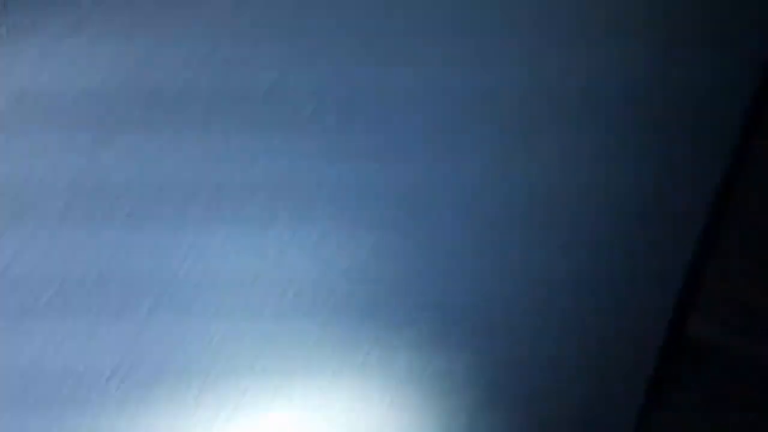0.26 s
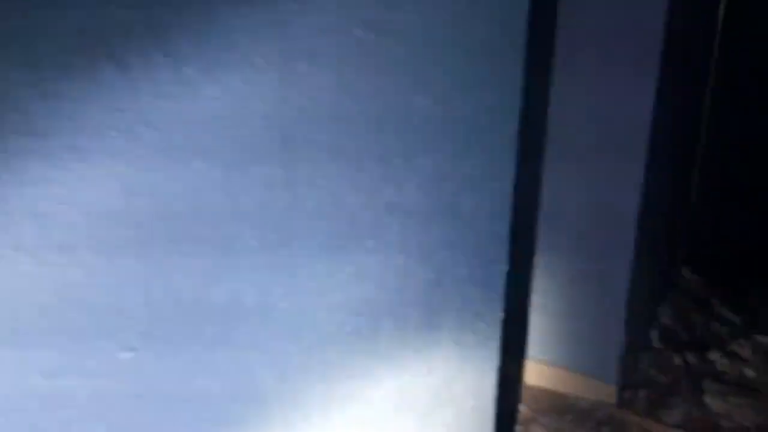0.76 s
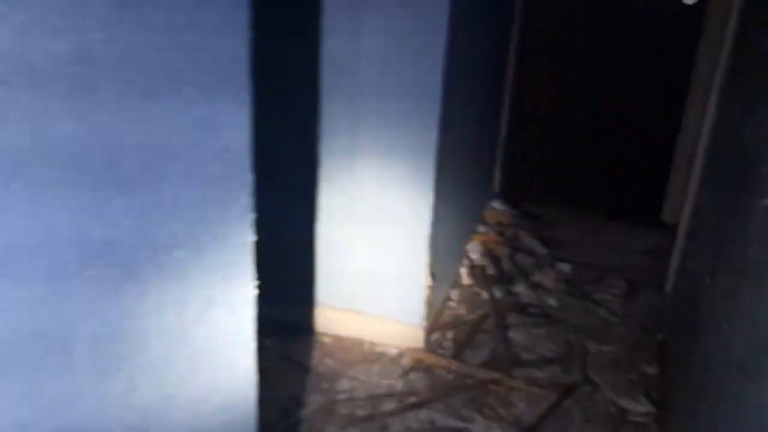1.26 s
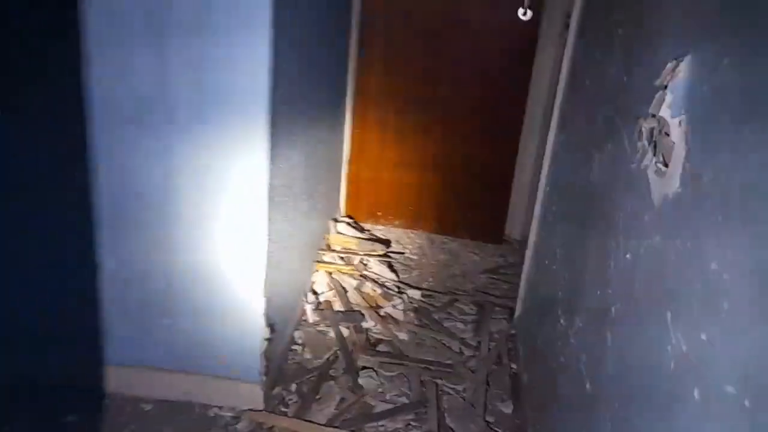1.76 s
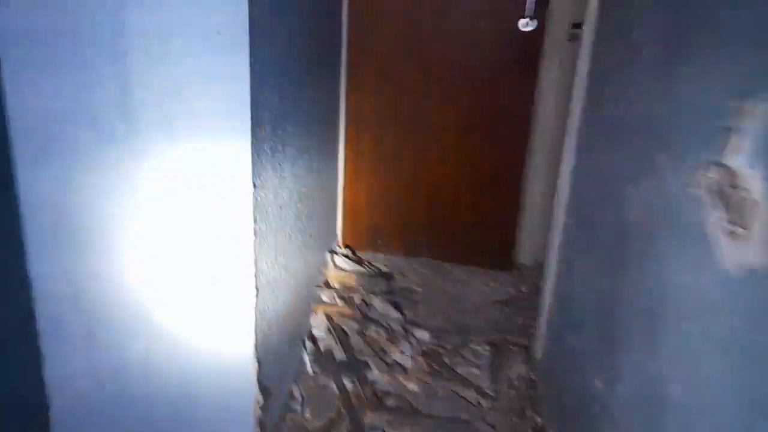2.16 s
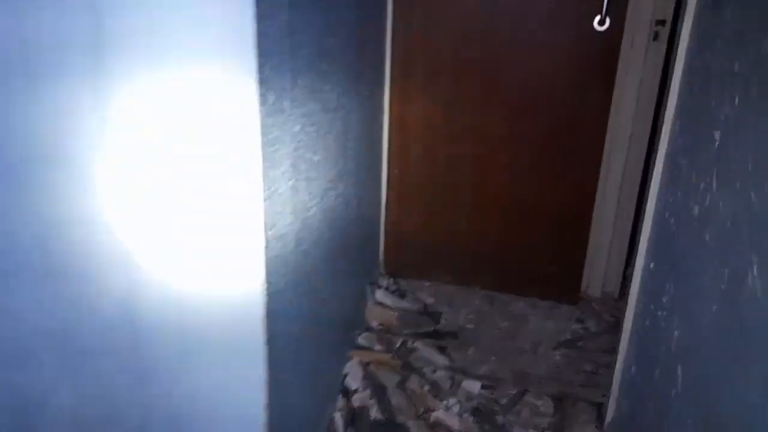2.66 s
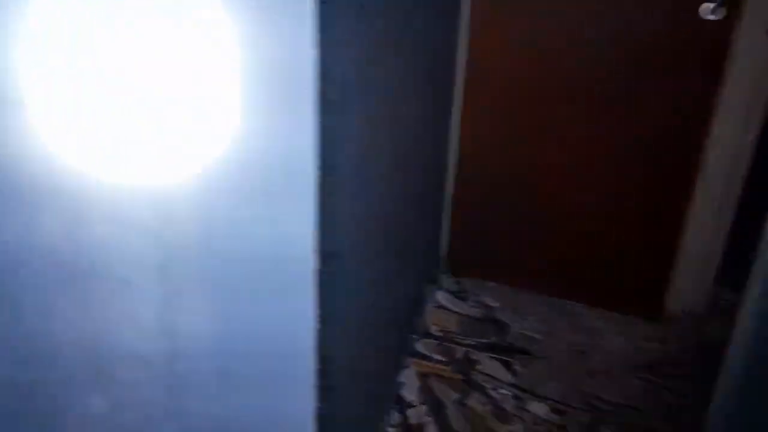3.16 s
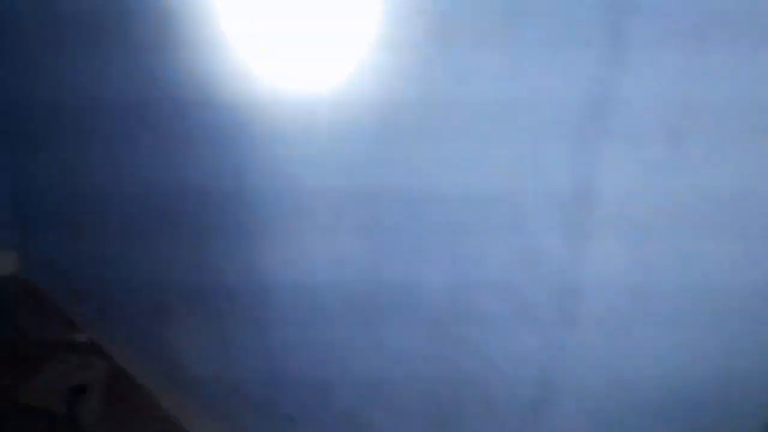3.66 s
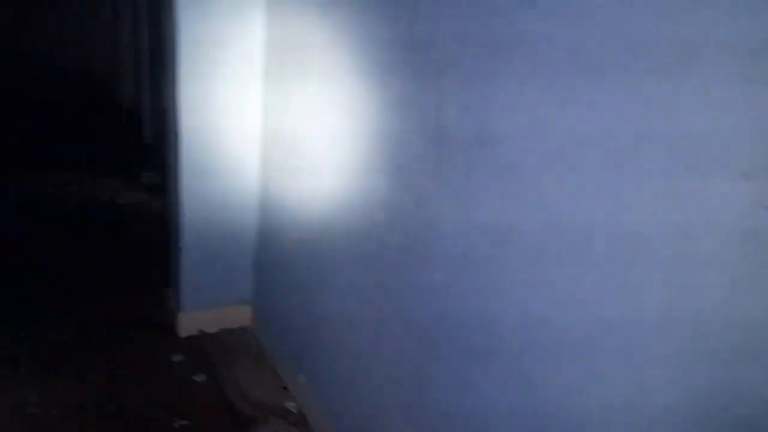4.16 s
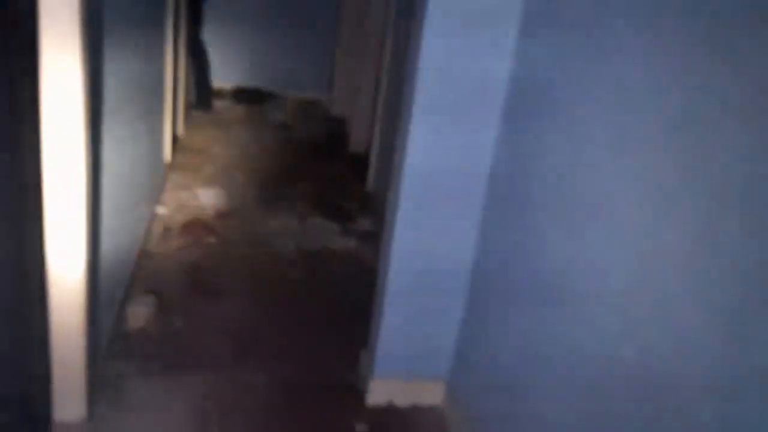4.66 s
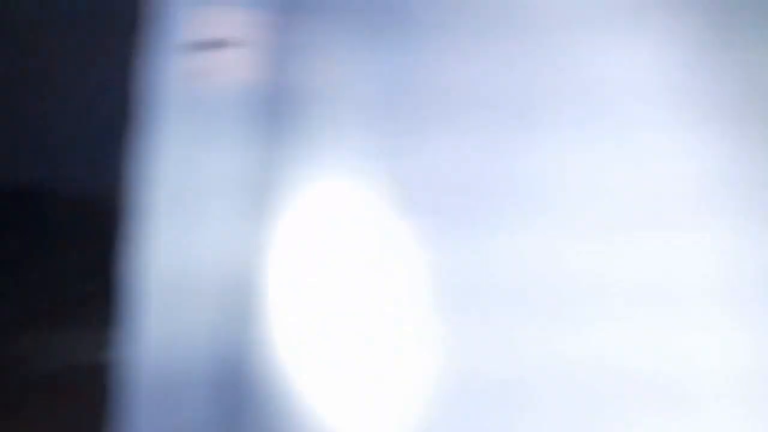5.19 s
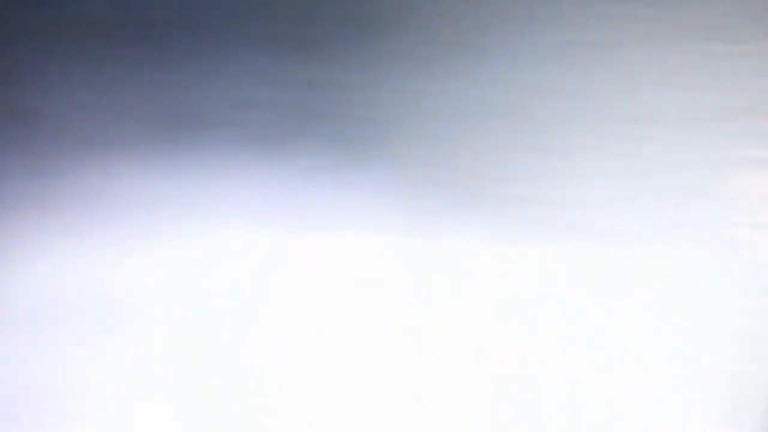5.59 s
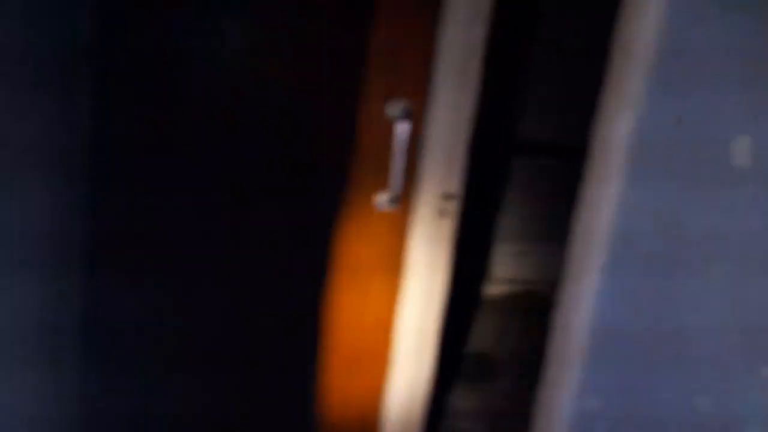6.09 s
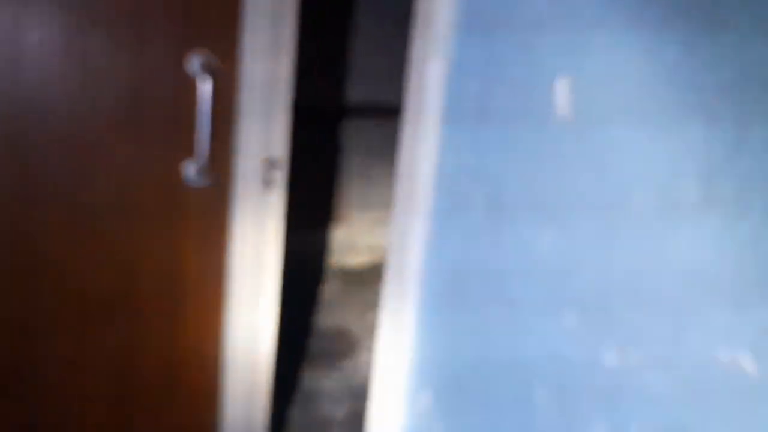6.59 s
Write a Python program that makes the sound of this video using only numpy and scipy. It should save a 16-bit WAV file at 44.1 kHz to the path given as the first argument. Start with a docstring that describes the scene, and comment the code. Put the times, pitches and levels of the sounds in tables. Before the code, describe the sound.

Someone walks unevenly across a littered wooden floor in a small, bare room. Steps thud on the boards, soles scuff, grit ticks and loose slats clack, with clothes swishing in between. About two seconds in, a board drags with a brief judder, then a shard breaks with a loud, sharp crack. Two more snaps follow later, before a last cluster of knocks. The sounds are close, in stereo, with a short ring off the walls.

```python
"""A small, bare, derelict room with a littered wooden floor, heard on a stereo pair of microphones.
Someone picks their way across: steps thud on the boards, loose slats clack, grit ticks, and brittle
shards snap underfoot, close by. One board drags, juddering as it sticks and slips. Clothes swish and
soles scuff in between, and the bare walls ring briefly after the knocks and cracks."""
import sys
import numpy as np
from scipy import signal
from scipy.fft import rfft, irfft, next_fast_len
from scipy.io import wavfile
from scipy.ndimage import uniform_filter1d

SR = 44100
rng = np.random.default_rng(int(sys.argv[2]) if len(sys.argv) > 2 else 0)


def wav_record(signal):
    """Record a signal, one row per channel, as 16-bit PCM in the file named by sys.argv[1]."""
    frames = np.transpose(np.atleast_2d(signal))
    bounded = np.clip(frames, -1, 1)
    # unit amplitude maps onto the largest positive 16-bit level
    quanta = np.round(bounded * 32767).astype(np.int16)
    wavfile.write(sys.argv[1], SR, quanta)


N = 301283
TIME = np.arange(N) / SR
CONTROL_S = np.arange(0, N / SR + .002, .002)   # coarse clock for the rubbing strokes
HIT_SIZE = SR // 2   # samples in a thud or the room's tail
BURST_HZ = np.arange(1025) * SR / 2048   # frequency axis of a crack

# feet and loose boards landing on the floor: t/s, level/dB, f/Hz
THUDS = [(.486, -24.5, 250), (.498, -23.5, 104), (.504, -28.5, 62), (.562, -34, 172), (0.759, -36, 86),
         (1.094, -41, 250), (1.331, -45, 114), (1.467, -27.5, 230), (1.469, -25, 108), (1.549, -36, 183),
         (1.616, -31.5, 175), (1.769, -37.5, 125), (1.85, -27, 200), (2.226, -23, 280), (2.403, -28, 170),
         (2.46, -18, 300), (2.574, -38, 175), (2.691, -13.5, 250), (2.73, -22, 178), (2.945, -40.5, 136),
         (3.245, -31, 242), (3.265, -27.5, 200), (3.292, -25, 209), (3.72, -29.5, 212), (3.762, -34, 154),
         (3.867, -39, 94), (4.187, -37.5, 208), (4.222, -27, 141), (4.322, -28.5, 254), (4.621, -31, 262),
         (4.734, -30.5, 203), (4.77, -33.5, 168), (5.079, -43, 177), (5.2, -43, 177), (5.98, -42.5, 170.4),
         (6.04, -48.5, 150), (6.489, -26.5, 126), (6.499, -30, 60), (6.523, -33.5, 294), (6.573, -35, 154),
         (6.661, -33, 270), (6.725, -33, 79)]
# resonances of the wooden floor: f/Hz, level/dB, t60/s
FLOOR_MODES = [(51.9, -4, .2), (67.5, -0.5, 0.36), (109.5, -2, 0.34), (137.7, -0.5, 0.22),
               (169.6, -5, 0.17), (183.5, -11, 0.34), (201.8, -3.5, 0.17), (250.8, -5.5, 0.3),
               (275.4, -6, 0.127), (334.2, -12, .25), (411, -3, 0.1), (480, -2.5, 0.17), (505, -17, 0.44),
               (583, 0.5, 0.14), (700, -27.5, 0.14), (737, -4.5, 0.25), (860, -3.5, .2)]


def from_db(db):
    """Decibels to gain."""
    return 10 ** (np.asarray(db) / 20)


def rms_one(x):
    """Scale to rms 1."""
    return x / np.sqrt(np.mean(x ** 2) + 1e-20)


def at_hz(points, hz):
    """Read a table on a log-frequency axis."""
    f, value = np.transpose(points)
    return np.interp(np.log(np.maximum(hz, 1)), np.log(f), value)


def band(x, low_hz, high_hz, order=2):
    """Causal band-pass."""
    sos = signal.butter(order, [low_hz, min(high_hz, SR / 2 - 500)], "band", fs=SR, output="sos")
    return signal.sosfilt(sos, x + 1e-18)


def add(out, s, sound):
    """Mix a sound in, starting at time s."""
    i = max(round(s * SR), 0)
    out[..., i:i + sound.shape[-1]] += sound[..., :N - i]


def panned(x, pan_db):
    """The nearer microphone hears it louder and a little sooner."""
    lag = int(np.clip(pan_db, -8, 8))   # one sample per dB
    left = np.pad(x, (max(-lag, 0), max(lag, 0)))
    right = np.pad(x, (max(lag, 0), max(-lag, 0)))
    return np.array([left * from_db(pan_db / 2), right * from_db(-pan_db / 2)])


def ring(clicks, hz, t60):
    """A unit click sets a sine of height 1 ringing."""
    r, w = 1e-3 ** (1 / (t60 * SR)), 2 * np.pi * hz / SR
    return signal.lfilter([0, np.sin(w)], [1, -2 * r * np.cos(w), r * r], clicks + 1e-18)


def resonate(force, modes):
    """A force rings the modes of a piece of wood, alternating in sign."""
    return sum((-1) ** k * from_db(db) * ring(force, hz, t60) for k, (hz, db, t60) in enumerate(modes))


def diffuse(colour, size=N):
    """Stereo noise of a given colour, alike at both microphones in the bass only; rms 1."""
    # likeness across the pair: f/Hz, left-right correlation
    likeness = [(50, 0.96), (200, 0.78), (350, 0.74), (650, 0.33), (1300, -0.15), (3000, -0.04),
                (7000, -0.058), (16000, -0.18)]
    count = next_fast_len(size)
    hz = np.arange(count // 2 + 1) * SR / count
    alike = at_hz(likeness, hz)
    mid, side = rfft(rng.standard_normal((2, count))) * from_db(at_hz(colour, hz))
    spectrum = np.sqrt(1 + alike) * mid + np.sqrt(1 - alike) * side * [[1], [-1]]
    return rms_one(irfft(spectrum, count)[:, :size])


def room_tone():
    """The faint hiss and rumble of the still room; rms 1."""
    # spectrum of the still air: f/Hz, level/dB
    still_air = [(18, -40), (30, 7.5), (355, -2), (426, -16.5), (740, 0), (3580, -15), (6720, -18),
                 (8080, -21.5), (14000, -13.5), (16000, -27)]
    return diffuse(still_air)


def room(x):
    """Dense reflections off bare walls, dying octave by octave; unit energy per microphone."""
    # reverberation time: f/Hz, t60/s
    room_t60 = [(80, 0.26), (250, 0.28), (700, 0.35), (2000, 0.39), (5000, 0.28), (9000, 0.24),
                (15000, 0.16)]
    t = np.arange(HIT_SIZE) / SR
    noise = diffuse([(20, 0), (20000, 0)], size=HIT_SIZE)
    edges_hz = np.geomspace(40, 20000, 10)
    tail = sum(band(noise, lo, hi, order=3) * 1e-3 ** (t / at_hz(room_t60, np.sqrt(lo * hi)))
               for lo, hi in zip(edges_hz, edges_hz[1:]))
    tail *= 1 - np.exp(-t / 0.00084)   # the reflections build up
    return signal.oaconvolve(x[None], tail / np.sqrt(np.sum(tail ** 2) / 2), axes=1)[:, :N]


def stroke(s, level_db, rise_s, fall_s):
    """Power of one rub: it gains 10 dB over rise_s, peaks at time s and loses 10 dB over fall_s."""
    before = np.clip((s - CONTROL_S) / rise_s, 0, 8)
    after = np.clip((CONTROL_S - s) / fall_s, 0, 8)
    drop_db = 10 * (before ** 0.98 + after ** 1.28)   # exponent 1 is a straight slope, 2 a bell
    return from_db(level_db - drop_db) ** 2


def envelope(power):
    """The power of strokes as a gain at every sample."""
    return np.interp(TIME, CONTROL_S, np.sqrt(power))


def grain(per_s, depth_db):
    """The uneven gain of a rubbing contact that catches and lets go."""
    steps = rng.standard_normal(N // 20)
    return rms_one(from_db(depth_db * np.interp(TIME * per_s, np.arange(len(steps)), steps)))


def catching_cloth():
    """The weave catches at a steady rate as it slides, giving a narrow rasp or squeak."""
    # catches of the cloth: t/s, level/dB, rise/s, fall/s, f/Hz, width/Hz
    catches = [(1.9, -56, .06, .25, 2750, 328), (2.14, -55, 0.11, 0.11, 2750, 250),
               (3.78, -54, 0.024, .06, 12600, 302), (5.99, -60, 0.012, 0.034, 2490, 200),
               (6.2, -70, 0.38, 0.29, 3080, 250), (6.28, -68, 0.31, 0.2, 4460, 350)]
    noise = rng.standard_normal((2, N))
    out = np.zeros((2, N))
    for s, db, rise_s, fall_s, hz, width_hz in catches:
        squeak = rms_one(band(noise, hz - width_hz / 2, hz + width_hz / 2, order=1))
        out += envelope(stroke(s, db, rise_s, fall_s)) * squeak
    return out


def movement(scuff_rise_s=0.027, settle_db=-43, settle_follows=0.36):
    """Gains of hiss, its top-end sheen, scuffing and floor rumble over all swings, scuffs and landings."""
    # swings of an arm or leg: t/s, level/dB, rise/s, fall/s, relative sheen/dB, relative dull flap/dB
    swishes = [(.47, -50.5, 0.22, .12, 6.5, -2), (.75, -47.5, 0.074, 0.12, 2.5, -3),
               (1.08, -54.5, 0.44, 0.14, -0.5, -0.5), (1.35, -57.5, 0.067, 0.21, -1, -4.5),
               (1.52, -53.5, 0.12, 0.18, 6, -4.5), (1.97, -43.5, 0.13, 0.29, 6.5, -5.5),
               (2.19, -49.5, 0.34, 0.75, -3, -20), (3.03, -66, 0.086, 0.05, -8, 1),
               (3.17, -59, 0.038, 0.54, 2, -0.5), (3.55, -47.5, 0.1, 0.23, -7, -3.5),
               (3.66, -48, 0.057, 0.045, 8, -4.5), (3.78, -53, 0.077, 0.17, 2, -3.5),
               (4.52, -59, 0.28, .2, -2, -12), (5.0, -53.5, 0.16, 0.52, 2, -2.5),
               (5.27, -56.5, 0.21, 0.14, 4, 4), (5.49, -58.5, .04, 0.21, 5, 3),
               (5.89, -54.5, 0.093, 0.087, 4, 2), (6.14, -62, 0.32, 0.37, 0.5, -5),
               (6.42, -57.5, 0.13, .1, 0, -25), (6.799, -49, 0.027, 0.088, 5.5, -3)]
    # soles scuffing the floor: t/s, level/dB, fall/s, relative hiss/dB
    scuffs = [(.5, -48, 0.093, -5.5), (.79, -58, 0.13, -14), (1.679, -48, 0.027, -0.5),
              (1.85, -46.5, 0.066, 0), (2.502, -46.5, 0.16, -7), (2.72, -48.5, 0.18, -21),
              (3.288, -46, 0.13, 2), (3.74, -52, 0.094, -4), (4.2, -54.5, 0.4, -4), (4.57, -50, 0.33, -3.5),
              (4.75, -52, 0.24, -4), (5.628, -47.5, .14, 4.5), (6.462, -44, 0.12, -5.5),
              (6.55, -42.5, 0.064, -4), (6.67, -53.5, .2, -3)]
    hiss, sheen, scuff, rumble = np.zeros((4, len(CONTROL_S)))
    for s, db, rise_s, fall_s, sheen_db, flap_db in swishes:
        power = stroke(s, db, rise_s, fall_s)
        hiss += power
        sheen += power * from_db(sheen_db) ** 2
        scuff += power * from_db(flap_db) ** 2
        rumble += power * from_db(-13) ** 2   # shifting weight stirs the floor
    for s, db, fall_s, hiss_db in scuffs:
        power = stroke(s, db, scuff_rise_s, fall_s)
        scuff += power
        hiss += power * from_db(hiss_db) ** 2
        sheen += power * from_db(hiss_db) ** 2
        rumble += power * from_db(-2.5) ** 2   # so does a moving foot
    for s, db, _ in THUDS:   # the floor settles after each landing
        rumble += stroke(s + scuff_rise_s, settle_db + settle_follows * db, scuff_rise_s, fall_s=.1)
    return [envelope(power) for power in (hiss, sheen, scuff, rumble)]


def clothes(hiss, sheen, split_hz=8500):
    """Sliding cloth swishes, with a separate gain for the sheen above the split."""
    # spectrum of rubbing cloth: f/Hz, level/dB
    cloth_colour = [(880, -37.5), (1500, -3), (1940, -2.5), (2120, -1.5), (2830, 0), (3380, -0.5),
                    (4730, -0.5), (5710, -3), (6960, -3), (8400, -6), (9190, -2), (9950, -7), (13900, -8.5),
                    (16000, -15.5)]
    fibres = diffuse(cloth_colour)
    top = signal.sosfiltfilt(signal.butter(2, split_hz, "high", fs=SR, output="sos"), fibres)
    return grain(per_s=37, depth_db=2.42) * (hiss * (fibres - top) + sheen * top)


def soles(scuff, gain_db=1.0, hollow_db=-9.0):
    """Soles scuff unevenly, and the floor's modes make the friction sound hollow."""
    # spectrum of a sole on wood: f/Hz, level/dB
    scuff_colour = [(180, -22), (300, -3), (431, -3), (560, -2), (629, -4.5), (818, -6.5), (863, -5),
                    (1030, -5), (1080, -8), (1170, -6.5), (1450, -8.5), (1570, -9), (1840, -10.5),
                    (2600, -20.5), (3380, -51.5), (5720, -120)]
    friction = diffuse(scuff_colour)
    hollow = from_db(hollow_db) * rms_one(resonate(friction, FLOOR_MODES))
    return from_db(gain_db) * scuff * grain(per_s=100, depth_db=2.2) * (friction + hollow)


def floor_rumble(rumble, gain_db=-0.5):
    """The boards rumble under moving weight."""
    # spectrum of the rumble: f/Hz, level/dB
    rumble_colour = [(18, -34), (30, -14), (59, -5.5), (92, -16), (128, -2), (151, -3), (211, -0.5),
                     (295, -3), (400, -18), (520, -31.5), (880, -120)]
    return from_db(gain_db) * rumble * grain(per_s=8.3, depth_db=3.5) * diffuse(rumble_colour)


def crumbs(scuff, gain_db=-8.0, per_s=170):
    """Crumbs roll under a scuffing sole: random tiny clicks, half direct and half room."""
    hits = rng.random(N) < per_s / SR
    sizes = from_db(0.96 * np.minimum(rng.exponential(1, N), 4))
    clicks = hits * sizes * rng.choice([-1, 1], N)
    direct = from_db(gain_db) * scuff * rms_one(band(clicks, 700, 6000, order=1))
    return (direct + room(direct)) / 2


def fracture(colour_db, decay_s):
    """One sharp click and a quickly dying crumble, in a given colour; peak 1."""
    t = np.arange(2 * len(BURST_HZ) - 2) / SR
    burst = 1.02 * rng.standard_normal(len(t)) * np.exp(-t / decay_s)
    burst[0] = 1
    phase = np.angle(rfft(burst))
    shaped = irfft(from_db(colour_db) * np.exp(1j * phase))
    crack = np.roll(shaped, 12)[:len(t) // 2]   # the shift keeps the click's leading edge
    return crack / np.abs(crack).max()


def shard(body_db, top_db, decay_s):
    """A brittle break: thick pieces have more body, thin ones a glassier top."""
    # spectrum of a shard's crack: f/Hz, level/dB
    shard_colour = [(200, -13.5), (600, -2.5), (1700, -1), (2900, -3), (3900, 6.5), (5300, 3), (7000, 7.5),
                    (9000, 0.5), (11000, -6), (13500, 1.5), (16000, -22.5)]
    thickness_db = at_hz([(1900, body_db), (3600, 0), (7500, 0), (11500, top_db)], BURST_HZ)
    return fracture(at_hz(shard_colour, BURST_HZ) + thickness_db, decay_s)


def grit():
    """Crumbs of plaster tick as the soles crush them."""
    # ticks of grit: t/s, level/dB, left-right/dB
    ticks = [(0.4695, -39, 8), (0.588, -32, -1), (.722, -34.5, 7), (0.9097, -40, 11), (2.848, -43, 11),
             (3.2775, -33, 5), (3.337, -33, -8.5), (3.397, -39, 5), (3.427, -31, 5), (4.737, -29.5, 4.5),
             (5.5724, -32, -3), (5.794, -34.5, 3.5), (6.781, -33, 3.5)]
    out = np.zeros((2, N))
    for s, db, pan_db in ticks:
        add(out, s, from_db(db) * panned(shard(body_db=8.0, top_db=5.0, decay_s=0.0015), pan_db))
    return out + room(out[0])


def dragged_board(slip_hz=80.17, slip_count=24, body_db=-16, rasp_db=-28.5, room_db=-7.0):
    """The board sticks and slips many times a second, ringing its modes and rasping at each slip."""
    # resonances of the board: f/Hz, level/dB, t60/s
    board_modes = [(107, -16, 0.089), (177.3, -3, 0.42), (259.4, 2.5, 0.26), (305.5, -7, 0.14),
                   (539, -24.5, .08), (631, -19.5, .1), (723, -21, .12), (843, -18.5, 0.11),
                   (886, -17, 0.055), (1260, -19, 0.055), (1718, -19, 0.045), (1810, -26.5, 0.15),
                   (2160, -23.5, 0.032)]
    # spectrum of its rasp: f/Hz, level/dB
    rasp_colour = [(210, -41), (350, -2), (385, -14), (844, -16.5), (1630, -22.5), (1730, -28), (1880, -23),
                   (8440, -27.5), (9290, -32.5), (14300, -26.5), (16000, -41)]
    # it swells as weight comes onto it, slides at full force and is let go
    start_s, full_s, release_s, end_s = 2.22, 2.3425, 2.364, 2.42
    swell_db_per_s, fade_db_per_s = 299.5, 748.5
    force_db = -swell_db_per_s * np.maximum(full_s - TIME, 0)
    force_db -= fade_db_per_s * np.maximum(TIME - release_s, 0)
    sliding = (TIME > start_s) & (TIME < end_s)
    jitter, strength = rng.standard_normal((slip_count, 2)).T
    slip_s = start_s + (np.arange(slip_count) + .025 * jitter) / slip_hz
    slips = np.zeros(N)
    slips[(slip_s * SR).astype(int)] = from_db(2 * strength)
    ringing = resonate(slips, board_modes)
    running_rms = np.sqrt(np.abs(uniform_filter1d(ringing ** 2, size=500)) + 1e-6)
    body = ringing / running_rms * from_db(body_db + force_db) * sliding   # the weight sets its swing
    judder = 1 + 0.13 * np.cos(2 * np.pi * slip_hz * (TIME - start_s))
    rasp = from_db(rasp_db + 0.47 * force_db) * sliding * judder * diffuse(rasp_colour)
    return body + from_db(room_db) * room(body) + rasp


def slats(ring_cycles=33.0, bounce_db=-11.0, bounce_s=.0165):
    """A light slat gives a broad woody crack and one short ring, thrown back once by the floor."""
    # loose slats knocking together: t/s, level/dB, f/Hz, relative ring/dB, room send/dB
    clacks = [(.563, -31.5, 1460, -29, 0.5), (.786, -39, 1320, -2, -18), (.864, -35, 680, -6.5, -15),
              (1.5497, -19, 2970, -16, 0.5), (1.552, -31.5, 715, -18, 3), (1.677, -33, 830, -11, -4),
              (2.226, -27, 900, -23, 9), (2.278, -28, 1160, -12, 13.5), (2.4615, -13, 1780, -16, -7.5),
              (2.529, -21, 2005, -34, -5), (2.6928, -20, 490, -15, 10), (2.694, -20, 2240, -16, -1),
              (2.737, -26, 660, -16, -3), (2.757, -26.5, 1310, -22, 0), (3.426, -35, 2390, -5, -20),
              (3.511, -20.5, 1430, -16, -2.5), (4.562, -34.5, 1190, -26, 4), (5.62, -34.5, 1000, -22, 11),
              (5.906, -36, 2020, -24, .5), (5.983, -40.5, 2370, -15, 6.5), (6.447, -38, 870, -15, 13),
              (6.52, -26, 983, -4.5, 5.5), (6.664, -32, 1230, -24, -15)]
    # a slat's broad resonance: multiple of its pitch, level/dB
    slat_colour = [(.15, -18.5), (.45, -8.5), (.75, -2.5), (1, 0), (1.4, -11.5), (2, -12), (3.2, -19.5),
                   (8, -28.5)]
    out, to_room = np.zeros((2, N)), np.zeros(N)
    for s, db, pitch, ring_db, room_db in clacks:
        colour_db = at_hz(np.array(slat_colour) * [pitch, 1], BURST_HZ)
        crack = np.pad(fracture(colour_db, decay_s=.0006), (0, HIT_SIZE // 8))
        tone = ring(signal.unit_impulse(len(crack)), pitch, t60=ring_cycles / pitch)
        clack = from_db(db) * (crack + from_db(ring_db) * tone)
        add(out, s, panned(clack, pan_db=rng.normal(0, 2.5)))
        add(out, s + bounce_s, from_db(bounce_db) * panned(clack, pan_db=rng.normal(0, 4.0)))
        add(to_room, s, from_db(room_db) * clack)
    return out + room(to_room)


def snaps(floor_s=.0138, wall_s=.021, wall_db=-29.0, room_s=.005):
    """Shards break close to the microphones; floor and wall each throw back a smeared slap."""
    # shards breaking: t/s, level/dB, left-right/dB, body/dB, glassy top/dB, slap/dB, room send/dB
    breaks = [(2.4634, -2, 5.5, 14, 12.5, -28, -7.5), (2.465, -4, -8, -16, 7, -28, -8.5),
              (2.4668, -14, 13, -10, 8.5, -25, -10), (2.6367, -22, 4.5, 7, -1, -7, -15),
              (4.321, -9.5, 6.5, 1.5, 3.5, -3, 4.5), (4.6156, -11, 7.5, 6, 8, -4, 5.5)]
    slap_colour_db = at_hz([(5000, 10), (15000, -14)], BURST_HZ)
    out, to_room = np.zeros((2, N)), np.zeros(N)
    for s, db, pan_db, body_db, top_db, slap_db, room_db in breaks:
        crack = from_db(db) * shard(body_db, top_db, decay_s=0.00019)
        add(out, s, panned(crack, pan_db))
        add(to_room, s, from_db(room_db - 7) * crack)   # early scatter off nearby debris
        add(to_room, s + room_s, from_db(db + room_db) * shard(body_db, top_db, decay_s=0.00051))
        for delay_s, surface_db in ((floor_s, 0), (wall_s, wall_db)):
            smear = np.array([fracture(slap_colour_db, decay_s=0.0015) for side in "LR"])
            smear /= np.linalg.norm(smear, axis=1, keepdims=True)
            slap = signal.fftconvolve(crack[None], smear, axes=1)
            add(out, s + delay_s, from_db(slap_db + surface_db) * slap)
    return out + room(to_room)


def footfalls(sharpness=3.86, room_db=-7.0):
    """Each landing rings the floor modes near its pitch; a softer contact favours the lower ones."""
    out, t = np.zeros(N), np.arange(HIT_SIZE) / SR
    hz, mode_db, t60 = np.transpose(FLOOR_MODES)
    rings = np.exp((2j * np.pi * hz - np.log(1000) / t60)[:, None] * t)
    for s, db, pitch in THUDS:
        scatter_db, phase_scatter = rng.standard_normal((2, len(hz)))
        contact = 1 / np.sqrt(1 + (sharpness * (hz / pitch - pitch / hz)) ** 2)
        strength = contact * from_db(mode_db + scatter_db) * np.exp(1.1j * phase_scatter)
        thud = (strength @ rings).imag / np.linalg.norm(strength) / 2
        press = 1 - np.exp(-t * pitch * 2.5)   # the sole takes part of a cycle to press down
        add(out, s, from_db(db) * press * thud)
    return out + from_db(room_db) * room(out)


def scene(air_db=-71.0):
    """Everything underfoot and the walker's clothes, over the room tone."""
    air = from_db(air_db) * room_tone()
    underfoot = footfalls() + slats() + snaps() + grit() + dragged_board()
    hiss, sheen, scuff, rumble = movement()
    rubbing = clothes(hiss, sheen) + soles(scuff) + floor_rumble(rumble) + crumbs(scuff)
    return air + catching_cloth() + rubbing + underfoot


def record(dry, notch_hz=9500, low_cut_hz=40, high_cut_hz=15900):
    """The microphone ports hollow out a treble band; peaks are rounded, deep bass and the top are cut."""
    hollow = dry - 0.62 * band(dry, notch_hz / 1.1, notch_hz * 1.02, order=1)
    lean = signal.sosfilt(signal.butter(4, low_cut_hz, "high", fs=SR, output="sos"), hollow)
    rounded = .8 * np.tanh(lean / .8)
    return signal.sosfilt(signal.ellip(10, .1, 80, high_cut_hz, fs=SR, output="sos"), rounded)


dry = scene()
out = record(dry)
wav_record(out)
```